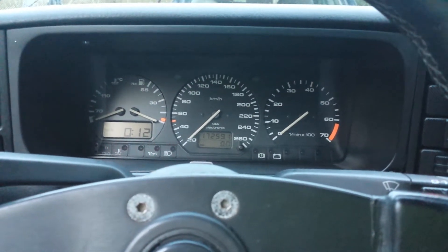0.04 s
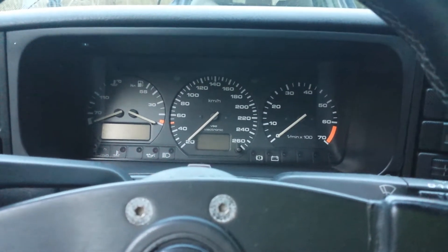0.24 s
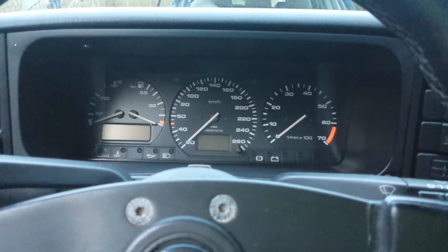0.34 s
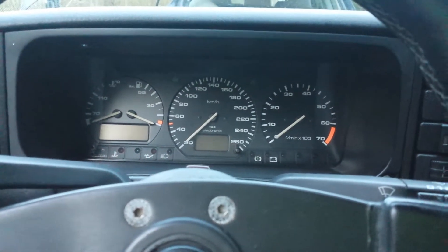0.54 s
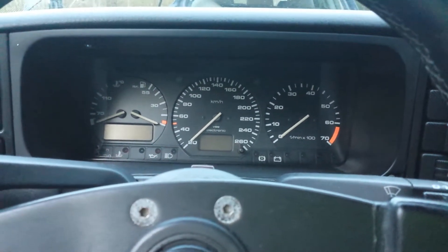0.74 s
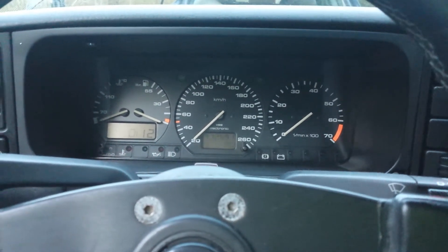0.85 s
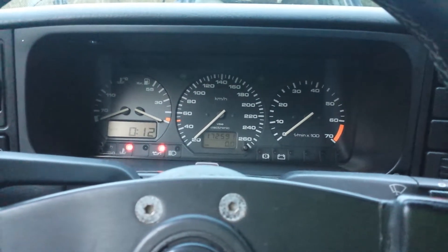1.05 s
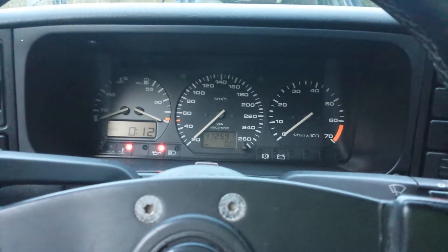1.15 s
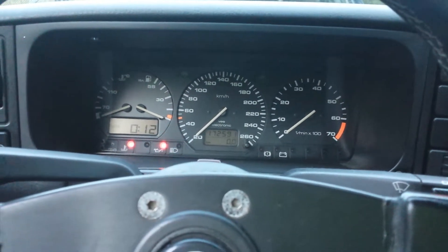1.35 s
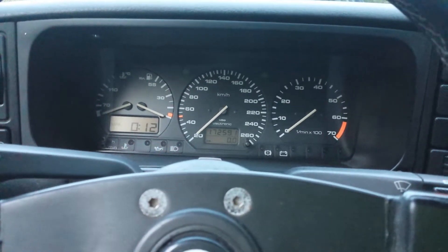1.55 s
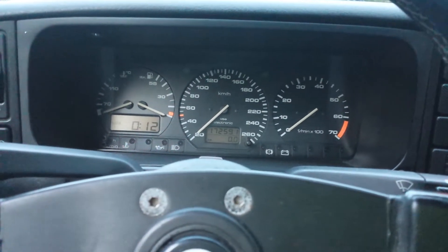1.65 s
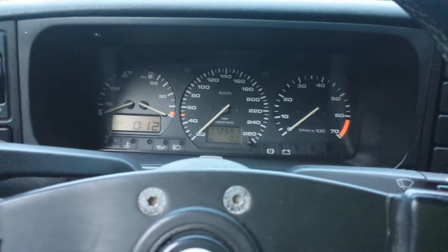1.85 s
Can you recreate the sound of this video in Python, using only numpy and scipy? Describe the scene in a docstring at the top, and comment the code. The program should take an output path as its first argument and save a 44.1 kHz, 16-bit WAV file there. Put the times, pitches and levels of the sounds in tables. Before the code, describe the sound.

A car starter clicks rapidly on a weak battery, thudding and rattling through the dashboard. The key snaps back, the chatter stops, and a single relay clunk follows, all heard from inside the parked car.

```python
"""Inside a parked car, the key is turned on a weak battery. The starter solenoid, an electromagnet
with a metal plunger, pulls in and drops out about 14 times a second, thudding through the body.
The key snaps back and a relay clunks later. An electric pump hums faintly and distant birds chirp.
Clicks are short bursts of shaped noise; thuds and knocks are tones that die away."""
import sys
import numpy as np
from scipy.fft import rfft, irfft, next_fast_len
from scipy.io import wavfile
from scipy.ndimage import map_coordinates

SR = 44100
rng = np.random.default_rng(int(sys.argv[2]) if len(sys.argv) > 2 else 0)


def digitize_waveform(pressure):
    """Quantize a signal to 16-bit integers and store it at the path in sys.argv[1].

    Rows of a 2-D input are taken as channels; values are limited to [-1, 1].
    """
    field = np.atleast_2d(pressure).T
    bounded = np.clip(field, -1, 1)
    quanta = np.round(bounded * 32767).astype(np.int16)
    wavfile.write(sys.argv[1], SR, quanta)


N = 83790
T = np.arange(N) / SR

# Bird calls. Each row: start and length in seconds, first, middle and last pitch in Hz, level in dB.
CHIRPS = [(1.285, .05, 5600, 5300, 4800, -76), (1.46, .026, 3400, 3750, 3450, -70),
          (1.58, .035, 5500, 5200, 4900, -76), (1.692, .025, 3850, 3950, 4150, -70),
          (1.735, .026, 3400, 3750, 3450, -70), (1.805, .02, 5700, 5500, 5400, -72),
          (1.842, .035, 5400, 5600, 5300, -72)]
# Loudness of the cabin's hush and of the pump. Each row: time in seconds, level in dB.
HUSH_LEVELS = [(0, -63.5), (.1, -72), (1.1, -65), (1.4, -66), (1.9, -60.5)]
PUMP_LEVELS = [(0, -70), (.05, -77), (.14, -70), (.9, -58), (1.1, -62.5), (1.22, -66), (1.35, -61.5),
               (1.42, -61), (1.55, -55), (1.7, -63), (1.8, -55), (1.9, -55.5)]
# Faint whines. Each row: pitch and its wander in Hz, level in dB, start and end in seconds.
WHINES = [(330, 8, -74, 1.05, 2), (735, 8, -79, 1.1, 2), (2100, 110, -79, 1.2, 2),
          (3900, 50, -83, 1.1, 1.35), (4450, 140, -80, 1.4, 2)]
# Small ticks: the plastic trim now and then, and at 0.135 s a short tick leading into the key's click. Each
# row: start in seconds, level in dB, treble level in dB, pitch in Hz.
TICKS = [(.006, -58, -53, 2670), (.092, -68, -81, 1870), (0.135, -55, -51, 3000), (.915, -45, -58.5, 1920),
         (.935, -41.5, -45.5, 2490), (1.033, -66, -77, 2580), (1.177, -61.5, -78.5, 2700)]
# The shaking car. Each row: time in seconds, then rumble, buzz and jingle levels in dB.
SHAKE_LEVELS = [(0.0, -88, -103.5, -108), (0.188, -77, -50.5, -54.5), (0.26, -65, -45.5, -50.5),
                (0.314, -52, -44.5, -48), (0.386, -51, -44, -47.5), (0.466, -52.5, -43, -46.5),
                (0.676, -47, -42, -41.5), (0.77, -48.5, -41, -42), (0.854, -43.5, -38.5, -43.5),
                (0.958, -46.5, -52, -53), (1.064, -57, -62.5, -67), (1.3, -78.5, -91, -80)]
# Dashboard knocks. Each row: start in seconds, level in dB, boost of the upper tones in dB.
KNOCKS = [(0.003, -54.5, 7.5), (0.144, -47, 0), (0.199, -54, 7), (0.235, -43, 5), (0.306, -37.5, -20),
          (0.329, -51, -4), (0.373, -38.5, -15), (0.441, -36, -36), (0.462, -38.5, -1), (0.492, -45, 7.5),
          (0.537, -38.5, 5), (0.577, -29.5, 2), (0.602, -39, -2), (0.636, -28, 0.5), (0.667, -48, 10),
          (0.706, -34, 6.5), (0.759, -37, 4), (0.828, -28.5, 0.5), (0.849, -37, 4), (0.884, -37, -8),
          (0.958, -27, -3.5), (0.983, -34.5, -1.5), (1.004, -43.5, 0)]
# Thuds in the body, and the plunger striking home. Each row: start in seconds, level in dB.
THUDS = [(0.007, -55), (0.145, -52), (0.181, -46), (0.232, -34.5), (0.304, -35), (0.38, -32), (0.452, -33),
         (0.525, -32), (0.595, -32.5), (0.663, -33.5), (0.724, -33.5), (0.791, -33), (0.857, -29.5),
         (0.966, -38), (0.999, -48), (1.544, -41)]
PULLS = [(0.1386, -24.5), (0.16, -30.5), (0.2374, -28), (0.3082, -28), (0.3834, -26), (0.4564, -27),
         (0.5292, -25.5), (0.6, -23.5), (0.6645, -23), (0.7322, -23), (0.797, -24.5), (0.9678, -24)]
# The plunger falling back, and a bracket rattling as it lets go.
# Each row: start in seconds, level in dB, seconds before it fades.
DROPS = [(0.196, -32, .012), (0.27, -26.5, 0.012), (0.345, -30.5, 0.0095), (0.415, -26.5, 0.015),
         (0.486, -28.5, 0.013), (0.558, -25, 0.017), (.628, -28.5, 0.014), (0.692, -25, 0.017),
         (0.76, -25.5, 0.017), (0.823, -20.5, 0.0096)]
RATTLES = [(.182, -44.5, 0.019), (.27, -40.5, 0.011), (.333, -42, 0.015), (.415, -38.5, 0.006),
           (.478, -40, 0.02), (.556, -38, 0.015), (.622, -38, 0.017), (.69, -38, 0.015),
           (.757, -37.5, 0.011), (.82, -34, 0.0084)]

# The tones that struck parts ring with. Each row: pitch in Hz, level in dB, seconds to fade by 60 dB.
BODY_TONES = [(169.2, 5.5, 0.1), (127, -13.5, 0.09), (214.4, -6.5, 0.16)]
DASH_TONES = [(339, 0, 0.11), (547, -1, 0.061), (424, -4.5, 0.023), (747, -6, 0.033), (993, -10, 0.071)]
RELAY_TONES = [(321, -17, 0.11), (434, -12, 0.096), (516, -10, 0.1), (761.6, -0.5, 0.057),
               (1003, -7.5, 0.067), (1258, 0.5, 0.041), (1643, -12, 0.036), (2025, -11.5, 0.066),
               (2325, 0.5, 0.025), (2616, -12, 0.049), (3020, -19.5, 0.056)]
# Resonances, the pitches a part favours. Each row: centre in Hz, width in Hz, level in dB.
CASING_PEAKS = [(4180, 160, -19), (4914, 59, 2), (5290, 47, -2), (5615, 53, -8.5), (6270, 53, -8),
                (7370, 58, 1.5), (8750, 150, -8.5), (10700, 35, -9.5)]
BRACKET_PEAKS = [(930, 570, -8.5), (1380, 130, 0), (1995, 280, 2.5), (2954, 320, 3)]
KEY_PEAKS = [(4930, 140, -4), (6270, 63, -4), (6500, 70, -2.5), (7100, 80, -2.5), (8030, 140, -0.5),
             (9050, 110, -4)]
# The colour of each noise, from bass to treble. Each row: frequency in Hz, relative level in dB.
HUSH_COLOUR = [(20, -3), (60, -14.5), (190, -3.5), (280, -12.5), (400, -13.5), (600, -20.5), (1160, -23.5),
               (2150, -23.5), (4500, -21.5), (7000, -24.5), (13800, -29.5), (15500, -50)]
BUZZ_COLOUR = [(53, -35.5), (90, -14), (151, -2), (255, -10), (357, 0), (471, -9.5), (1200, -15),
               (2870, -15), (3500, -22), (4550, -56), (7700, -120)]
RELAY_COLOUR = [(180, -16.5), (300, -14), (807, -4.5), (1840, -12.5), (2400, -11), (9130, -32.5),
                (14700, -73), (15500, -69)]
KEY_COLOUR = [(530, -54.5), (900, -31.5), (1750, -4.5), (2020, -11), (3180, -9.5), (5760, -2.5),
              (7230, 1.5), (9500, -12), (13600, -23), (14800, -25), (15500, -66)]
PULL_COLOUR = [(410, -33), (700, -2.5), (1050, -17.5), (3440, -10), (5780, 0.5), (7590, -8.5), (8530, -9),
               (13600, -18.5), (14500, -33.5), (15500, -61)]
DROP_COLOUR = [(1470, -42), (2500, -14.5), (4640, -5.5), (5920, 1), (6240, -8), (13800, -28.5),
               (14800, -44), (15500, -76.5)]
# How alike left and right are. Each row: frequency in Hz, likeness (1 is the same, 0 is unrelated).
LIKENESS = [(60, 0.98), (180, 0.75), (550, 0.65), (1650, -0.069), (4970, 0.12), (15000, -0.14)]
# Balance of the lock, which sits to the right, and of the whole sound.
# Each row: frequency in Hz, left minus right in dB.
KEY_BALANCE = [(1000, -3), (6000, 2.5), (8000, -5.5), (14000, -2.5)]
OVERALL_BALANCE = [(60, 0.5), (150, -3), (380, -1), (950, -1.5), (2380, -2.5), (5500, 1), (7500, -6),
                   (9000, -6), (15000, -10)]

KEY_TURN_S, KEY_SCRAPE_S, KEY_SNAP_S = .1395, .844, .8511
RELAY_S, RELAY_DB = 1.5315, -22
PUMP_HZ, PUMP_WANDER_HZ = 155.2, 9.1
CREST_DB = 7  # how far a burst's peak stands above its average level
TOP_HZ = 15600


def amp(db):
    """Turn decibels into a gain."""
    return 10 ** (np.asarray(db) / 20)


def wobble(rate):
    """A smooth random curve through `rate` new values a second."""
    return map_coordinates(rng.standard_normal(int(N * rate / SR) + 4), [T * rate])


def along(points, hz):
    """Read between (Hz, value) points on a log frequency axis."""
    freqs, values = np.transpose(points)
    return np.interp(np.log(hz + 1), np.log(freqs + 1), values)


def curves(rows):
    """One value per sample for each column after the time."""
    times, *columns = np.transpose(rows)
    return [np.interp(T, times, column) for column in columns]


def filtered(x, response):
    """Scale and delay each frequency of x as response(hz) says."""
    size = next_fast_len(N + SR // 2)
    return irfft(rfft(x, size) * response(np.fft.rfftfreq(size, 1 / SR)), size)[..., :N]


def peaks(table):
    """The response of a set of resonances, added with alternating signs."""
    return lambda hz: sum((-1) ** k * amp(db) * 1j * hz * width / (centre**2 - hz**2 + 1j * hz * width)
                          for k, (centre, width, db) in enumerate(table))


def ringing(colour, resonances, strength):
    """A noise colour with resonances laid over it."""
    return lambda hz: amp(along(colour, hz)) * (1 + strength * peaks(resonances)(hz))


def balance(table, hz):
    """Left and right gains, each taking half of the level gap."""
    return amp(along(table, hz) * np.array([[.5], [-.5]]))


def noise(colour, envelope=1):
    """Stereo noise shaped by an envelope, then coloured without changing its power."""
    def mid_and_side(hz):
        angle = np.arccos(np.clip(along(LIKENESS, hz), -1, 1)) / 2
        return colour(hz) / average_gain * [np.cos(angle), np.sin(angle)]

    average_gain = np.sqrt(np.mean(np.abs(colour(np.linspace(1, SR / 2, 4000))) ** 2))
    mid, side = filtered(envelope * rng.standard_normal((2, N)), mid_and_side)
    return np.array([mid + side, mid - side])


def bursts(rows, rise, t60, colour, tail_db, tail_t60=.3, grit_db=0):
    """Noise for each (start, dB, hold) that fades 60 dB in t60 seconds and leaves a cabin echo."""
    power, tail = np.zeros((2, N))
    for start, db, hold in rows:
        age = np.clip(T - start, 0, None)
        attack = amp(2 * db) * (1 - np.exp(-age / rise)) ** 2
        power += attack * amp(-120 * np.clip(age - hold, 0, None) / t60)
        tail += attack * amp(2 * tail_db - 120 * age / tail_t60)
    grit = amp(grit_db * wobble(400)) ** 2
    return noise(colour, np.sqrt(power * grit / grit.mean() + tail))


def rings(rows, tones, rise, wide, rough, sag=0, climb=.015):
    """Each blow (start, dB, upper boost) rings the tones; they start flat by the share `sag`."""
    out = np.zeros((2, N + SR))
    age = np.arange(SR // 3) / SR
    bent_time = age - sag * climb * (1 - np.exp(-age / climb))
    attack = (1 - np.exp(-age / rise)) ** 2
    chance = rng.standard_normal((len(rows), len(tones), 3))  # no two blows are quite alike
    drift = [rough * np.pad(wobble(90), (0, SR)) for _ in tones]  # phase jitter roughens the ring
    for (start, db, upper_db), draws in zip(rows, chance):
        span = slice(round(start * SR), round(start * SR) + len(age))
        for k, ((hz, level, t60), (scatter, detune, side)) in enumerate(zip(tones, draws)):
            boost_db = (k > 0) * (upper_db + 1.5 * scatter)
            envelope = amp(db + level + boost_db - 60 * age / t60) * attack
            stereo_shift = wide * side * np.sqrt(hz / 300) * np.array([[1], [-1]])
            phase = 2 * np.pi * hz * (1 + .013 * detune) * bent_time + stereo_shift
            out[:, span] += envelope * np.sin(phase + drift[k][span] - drift[k][span][0])
    return out[:, :N]


def wavering_tone(hz, wander_hz):
    """A tone of power 1 whose pitch wanders quickly."""
    return np.sqrt(2) * np.sin(2 * np.pi * np.cumsum(hz + wander_hz * wobble(400)) / SR)


def birds():
    """Short gliding whistles with a slight trill, far away."""
    out = np.zeros(N)
    for start, length, first, middle, last, db in CHIRPS:
        u = np.clip((T - start) / length, 0, 1)  # runs from 0 to 1 through the call
        glide_hz = first * (1 - u) * (1 - 2 * u) + 4 * middle * u * (1 - u) + last * u * (2 * u - 1)
        envelope = amp(db + 2.5 * wobble(150)) * np.sqrt(np.sin(np.pi * u).clip(0))
        trilled_hz = glide_hz * (1 + .008 * wobble(300))
        out += envelope * np.sin(2 * np.pi * np.cumsum(trilled_hz) / SR)
    return out


def pump_and_air():
    """The pump's wavering hum, faint whines and the cabin's hush."""
    hum = amp(curves(PUMP_LEVELS)[0] + 1.2 * wobble(12.77)) * wavering_tone(PUMP_HZ, PUMP_WANDER_HZ)
    whine = np.zeros(N)
    for hz, wander_hz, db, start, end in WHINES:
        fade = np.clip(np.minimum(T - start, end - T) / .06, 0, 1)
        whine += amp(db + 4 * wobble(40.1)) * wavering_tone(hz, wander_hz) * fade
    hush = amp(curves(HUSH_LEVELS)[0]) * noise(lambda hz: amp(along(HUSH_COLOUR, hz)))
    return hum + whine + hush


def small_ticks():
    """The plastic trim ticks now and then, and a short tick leads into the key's click; each tick has a lower
    and a brighter part."""
    low = sum(bursts([(start, db, .005)], .001, .03, lambda hz: peaks([(pitch, 1700, 0)])(hz) ** 2,
                     tail_db=-30, tail_t60=.17) for start, db, _, pitch in TICKS)
    high = bursts([(start, db, .002) for start, _, db, _ in TICKS], .00065, .029,
                  peaks([(5640, 1200, 0)]), tail_db=-22.5, tail_t60=.17)
    return low + high


def shaking():
    """The shaken car rumbles, buzzes and jingles."""
    rumble_db, buzz_db, jingle_db = curves(SHAKE_LEVELS)
    rumble = amp(rumble_db) * noise(peaks([(42, 23, 0)]))
    buzz = amp(buzz_db) * noise(lambda hz: amp(along(BUZZ_COLOUR, hz)))
    jingle_colour = lambda hz: amp(along(PULL_COLOUR, hz) + .5 * np.log2(hz / 5000 + .01))
    jingle = amp(jingle_db + 1.8 * wobble(300)) * noise(jingle_colour)
    return (T < SHAKE_LEVELS[-1][0]) * (rumble + buzz + jingle)


def body_and_dashboard():
    """The body shell thuds; the dashboard knocks, then settles with a rising moan."""
    thuds = rings([(start, db, 0) for start, db in THUDS], BODY_TONES,
                  rise=.0026, wide=.15, rough=.3, sag=.28, climb=.011)
    moan = rings([(1.03, -40, 0)], [(350, 0, .24)], rise=.008, wide=.2, rough=.3, sag=.2, climb=.05)
    knocks = rings(KNOCKS, DASH_TONES, rise=.00095, wide=.3, rough=.35)
    return thuds + moan + knocks


def relay():
    """One clunk: a short crack and the ring of the relay's box."""
    colour = lambda hz: amp(along(RELAY_COLOUR, hz)) * hz**2 / (200**2 + hz**2)  # thinned below 200 Hz
    crack = bursts([(RELAY_S, RELAY_DB - 2.5, .004)], .00024, .045, colour,
                   tail_db=-10.5, tail_t60=.12, grit_db=4)
    box = rings([(RELAY_S + .000952, RELAY_DB + 1, 0)], RELAY_TONES, rise=.00051, wide=.22, rough=1.33)
    return crack + box


def key():
    """The key clicks into the start position, later scrapes and snaps back with a ping."""
    moves = [(KEY_TURN_S, -35, .003), (KEY_SCRAPE_S, -34, .003), (KEY_SNAP_S, -16.5, .002)]
    clicks = bursts(moves, .00031, .064, ringing(KEY_COLOUR, KEY_PEAKS, 1.1),
                    tail_db=-11.5, tail_t60=.11, grit_db=-.5)
    ping = bursts([(KEY_SNAP_S, -30, .002)], .00057, .013, peaks([(1840, 230, 0)]),
                  tail_db=-26.5, tail_t60=.089)
    return filtered(clicks + ping, lambda hz: balance(KEY_BALANCE, hz))


def solenoid():
    """The plunger's sharp strikes and softer falls ring the casing; a bracket rattles along."""
    pulls = bursts([(start, db - CREST_DB, .004) for start, db in PULLS], .0017, .074,
                   ringing(PULL_COLOUR, CASING_PEAKS, 1.7), tail_db=-16.5, grit_db=.5)
    drops = bursts([(start, db - CREST_DB, hold) for start, db, hold in DROPS], .0014, .032,
                   ringing(DROP_COLOUR, CASING_PEAKS, 2.3), tail_db=-26.5)
    bright_contact = bursts([(start, db - CREST_DB - 9, .002) for start, db in PULLS], .00048, .028,
                            lambda hz: peaks([(8700, 4500, 0)])(hz) ** 2, tail_db=-13, tail_t60=.16)
    bracket = bursts(RATTLES, .004, .13, peaks(BRACKET_PEAKS), tail_db=-2, tail_t60=.22, grit_db=1)
    return pulls + drops + bright_contact + bracket


def scene():
    """The failed start over its quiet background, in stereo."""
    failed_start = solenoid() + shaking() + body_and_dashboard() + key() + small_ticks() + relay()
    return failed_start + pump_and_air() + birds()


def record(dry):
    """The left side is duller than the right, and nothing passes above TOP_HZ."""
    return filtered(dry, lambda hz: balance(OVERALL_BALANCE, hz) * (hz < TOP_HZ))


dry = scene()
out = record(dry)
digitize_waveform(out)
```